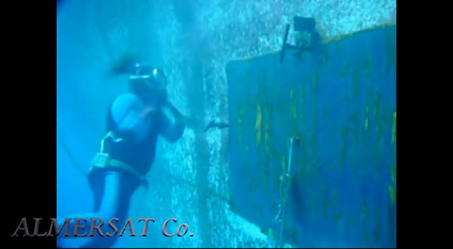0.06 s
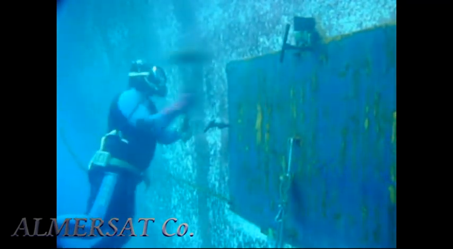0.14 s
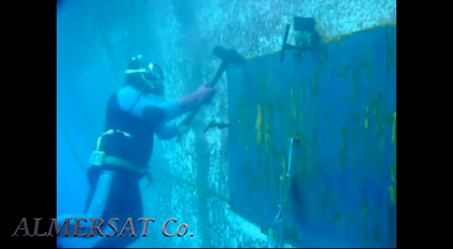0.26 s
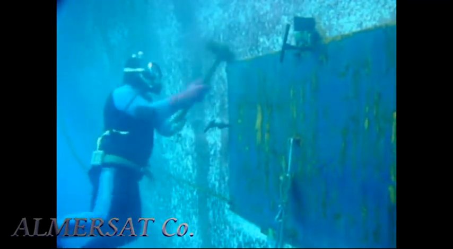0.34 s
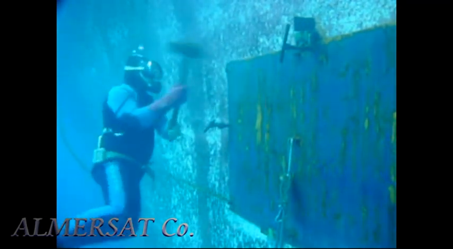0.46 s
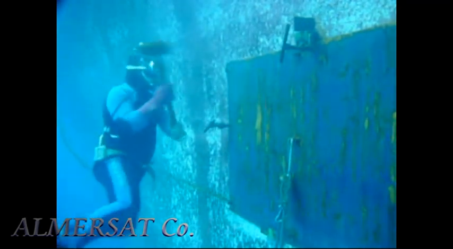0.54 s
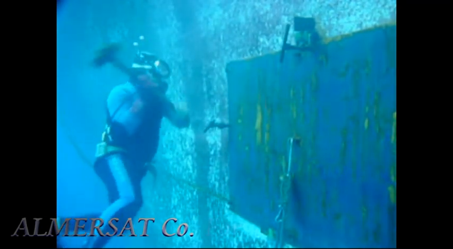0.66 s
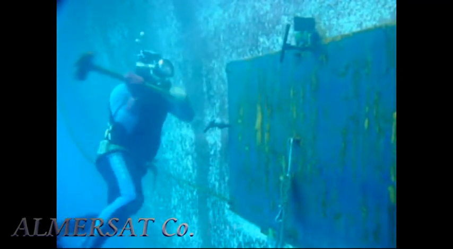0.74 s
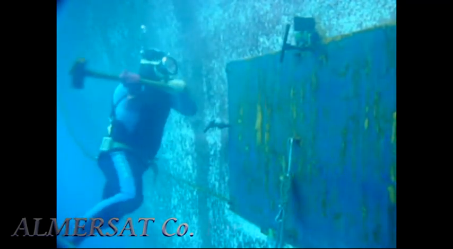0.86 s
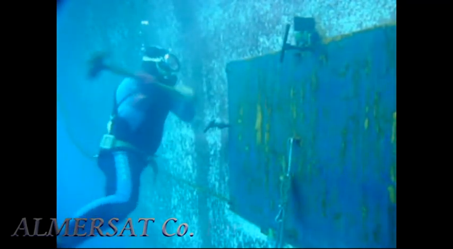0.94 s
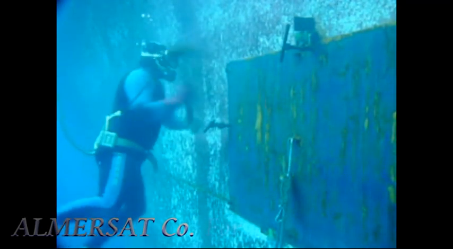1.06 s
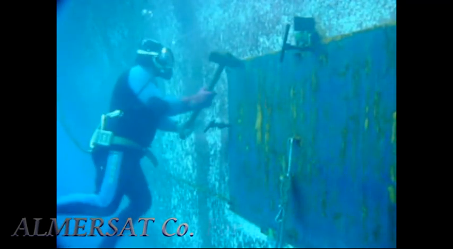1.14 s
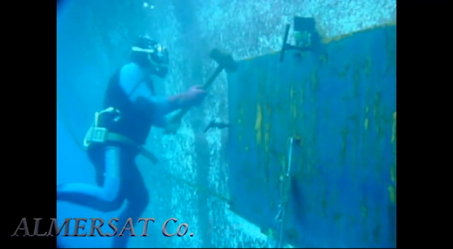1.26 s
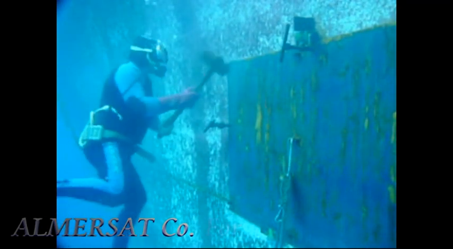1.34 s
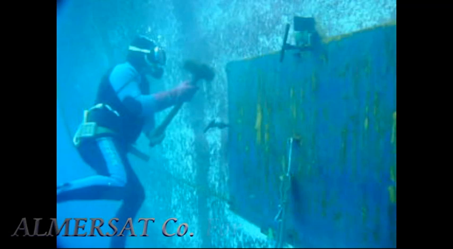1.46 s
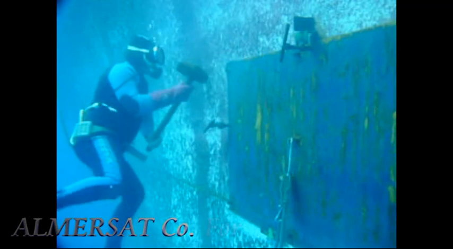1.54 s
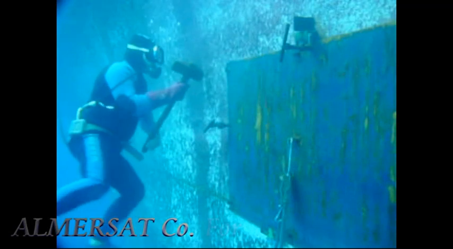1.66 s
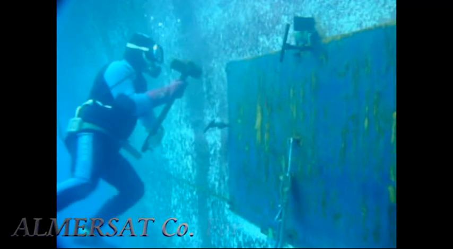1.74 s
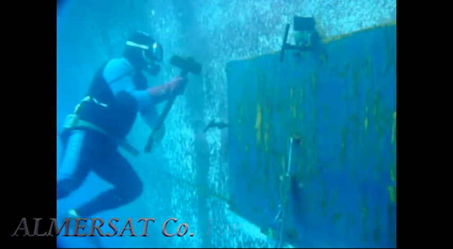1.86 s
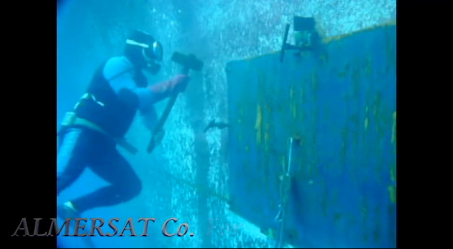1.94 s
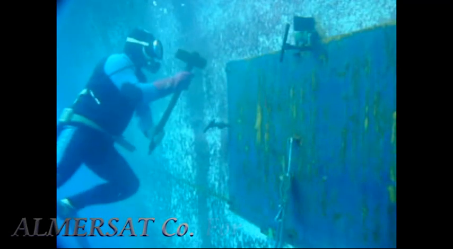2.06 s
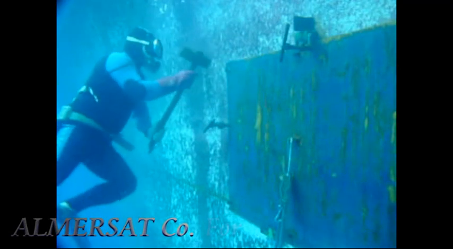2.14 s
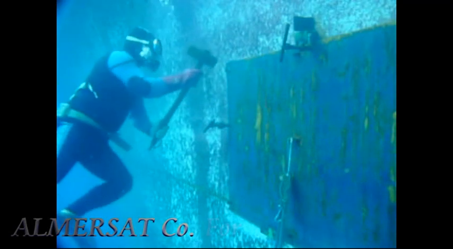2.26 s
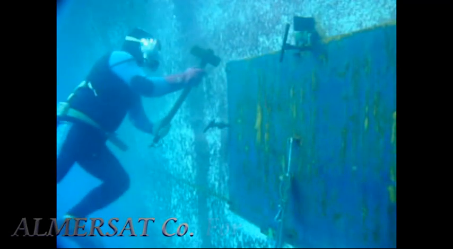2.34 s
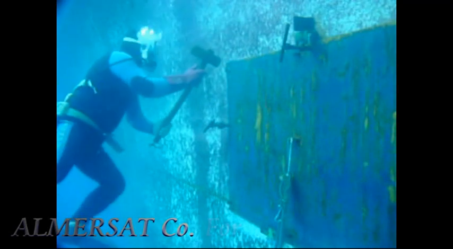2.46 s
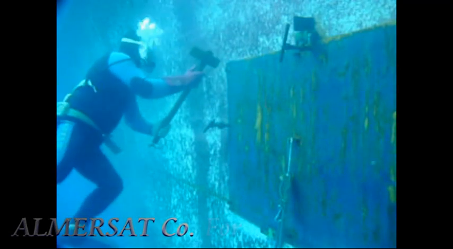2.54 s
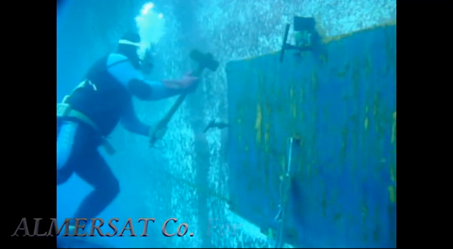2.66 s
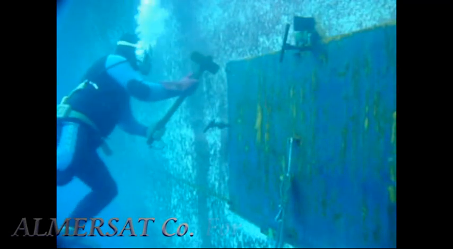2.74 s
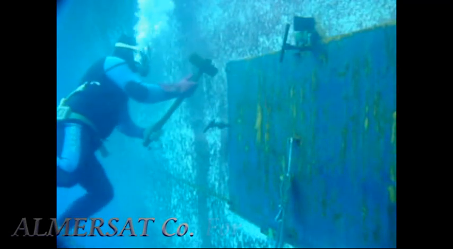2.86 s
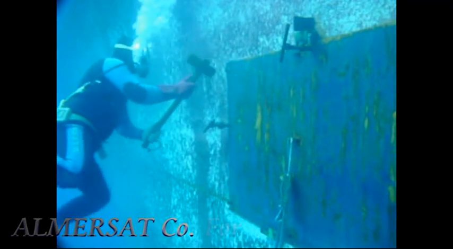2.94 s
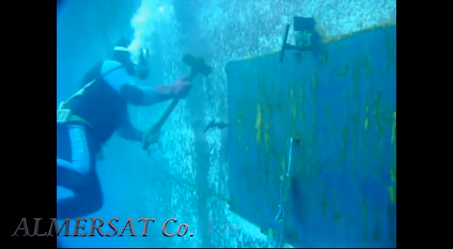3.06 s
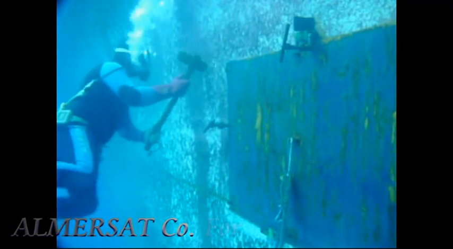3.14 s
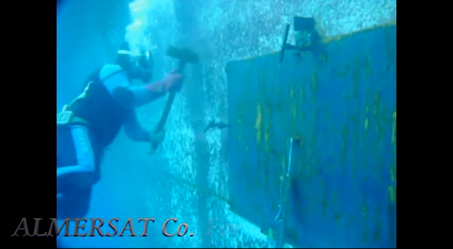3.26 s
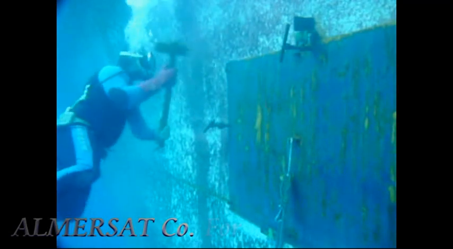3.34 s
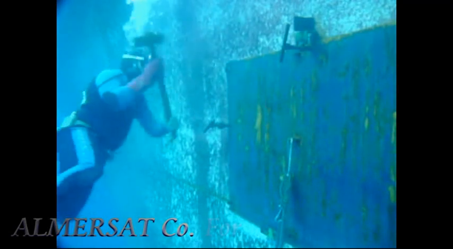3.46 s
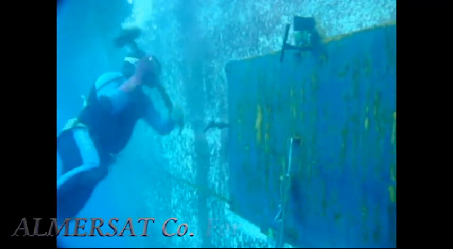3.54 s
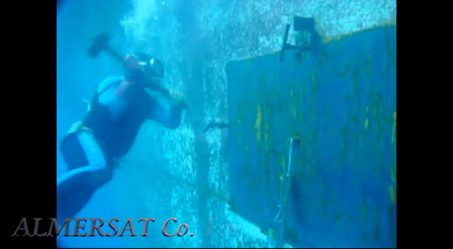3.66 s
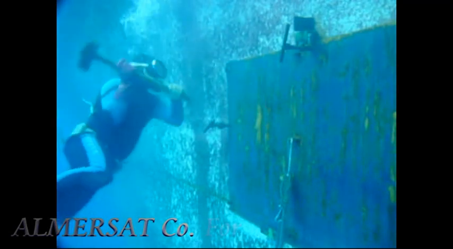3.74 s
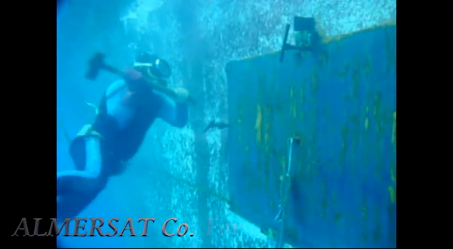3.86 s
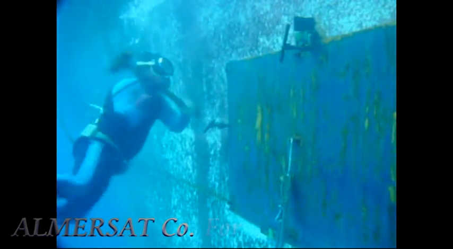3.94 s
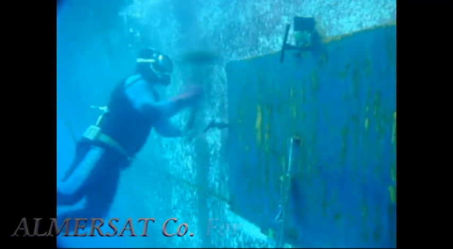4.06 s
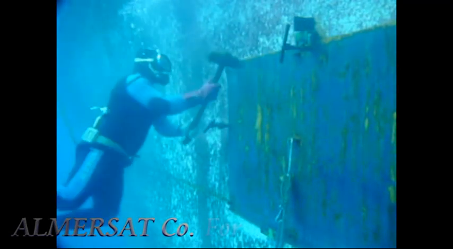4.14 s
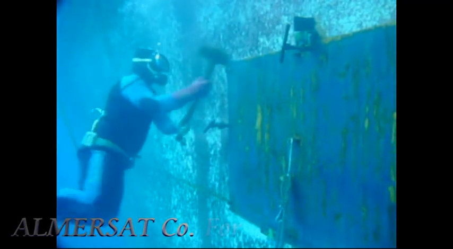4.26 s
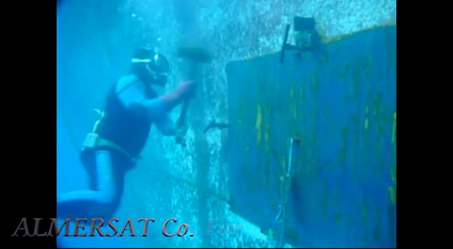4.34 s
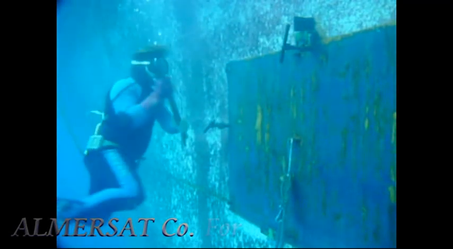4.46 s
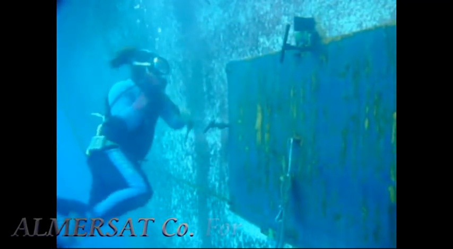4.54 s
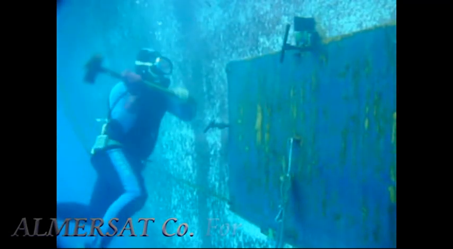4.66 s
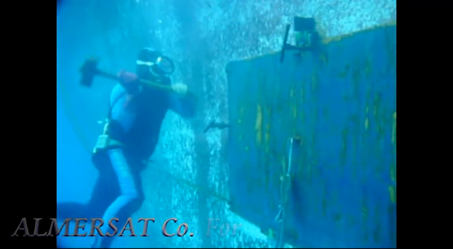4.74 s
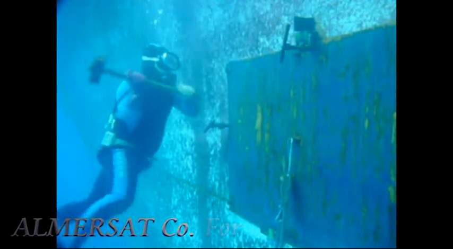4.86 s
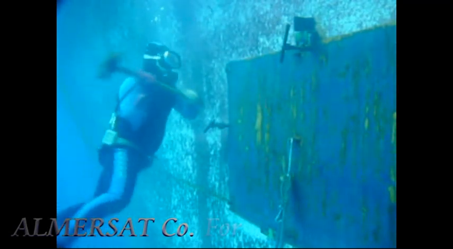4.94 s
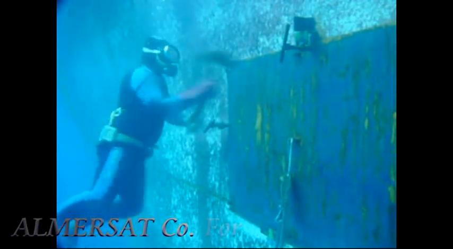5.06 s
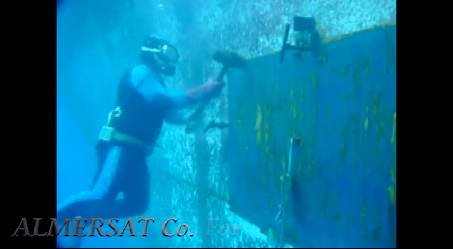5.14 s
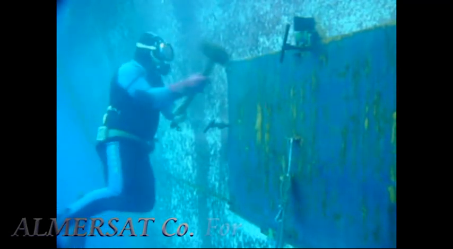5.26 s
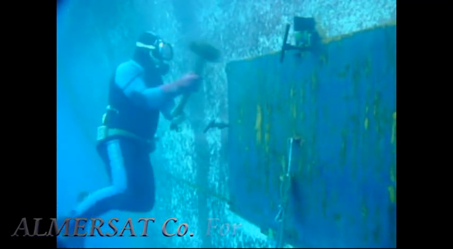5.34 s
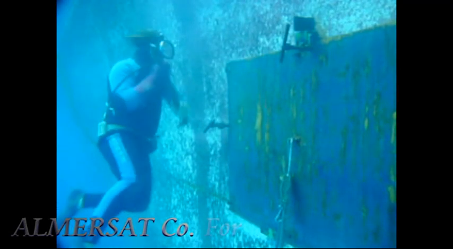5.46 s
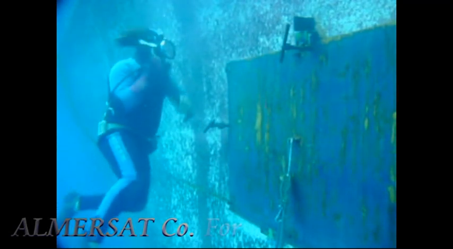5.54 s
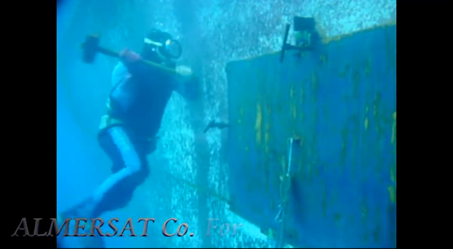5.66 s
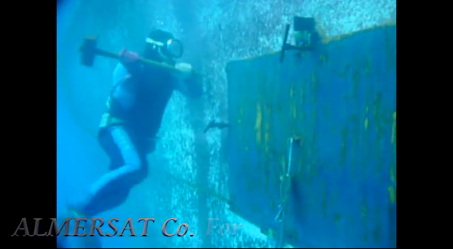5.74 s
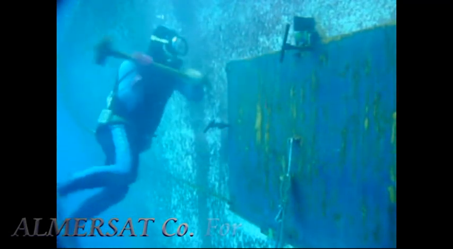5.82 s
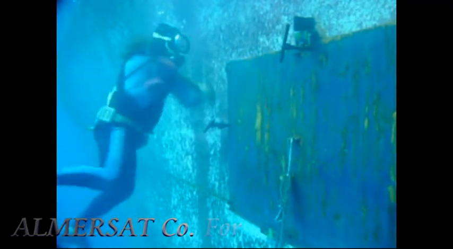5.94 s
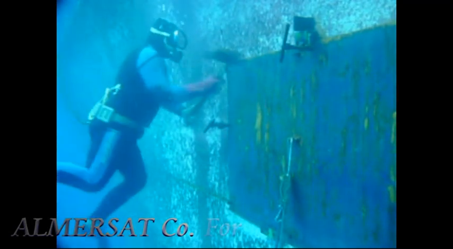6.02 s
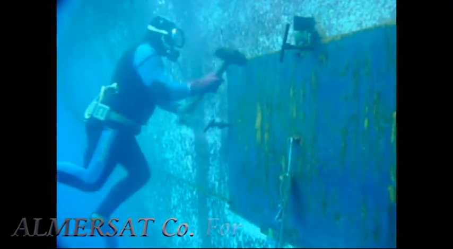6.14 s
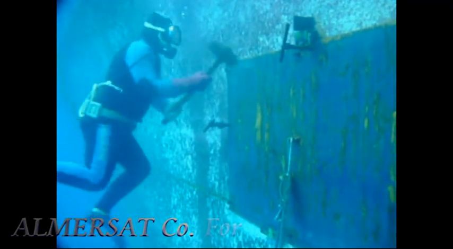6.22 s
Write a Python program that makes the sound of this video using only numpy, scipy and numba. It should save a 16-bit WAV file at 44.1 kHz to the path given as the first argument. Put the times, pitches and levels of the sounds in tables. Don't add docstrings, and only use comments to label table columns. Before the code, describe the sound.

Five heavy, muffled metal hammer blows overload the microphone beneath the water, each followed by a long hollow hull ring and a returning rush.

```python
import sys
import numpy as np
from scipy import signal
from scipy.fft import rfft, irfft, next_fast_len
from scipy.io import wavfile
from scipy.ndimage import uniform_filter1d, map_coordinates
from numba import njit

SR = 44100
rng = np.random.default_rng(int(sys.argv[2]) if len(sys.argv) > 2 else 0)


def magnitude_from_level(level_db):
    exponent = np.asarray(level_db, float) / 20
    return 10 ** exponent


def generate_wav(signal):
    frames = np.transpose(np.atleast_2d(signal))
    scaled = np.clip(frames, -1, 1) * 32767
    pcm = np.round(scaled).astype(np.int16)
    wavfile.write(sys.argv[1], SR, pcm)


N = 277389

# start in seconds, then levels in dB of plate, hull, lower rib and upper rib.
BLOWS = [
    (0.2444, 21.5, 5, -7, 5),
    (1.1724, 21, 5.5, 8, 4.5),
    (4.151, 23.5, 3, 1.5, 11),
    (5.1331, 23, 8, -5.5, 6.5),
    (6.0881, 22.5, 7.5, -5, -12),
]


def unit(x):
    return x / np.sqrt(np.mean(x ** 2) + 1e-20)


def along(points, hz):
    f, v = np.transpose(points)
    return np.interp(np.log(hz + 1), np.log(f + 1), v)


def filtered(x, response):
    m = next_fast_len(N + SR // 2)
    return irfft(rfft(x, m) * response(np.fft.rfftfreq(m, 1 / SR)), m)[..., :N]


def follow(x, span):
    keep = np.exp(-1 / (span * SR))
    return signal.lfilter([1 - keep], [1, -keep], x)


def noise(spectrum, patchy_db):
    hz, t, z = signal.stft(rng.standard_normal((2, N)), SR, nperseg=512)
    field = uniform_filter1d(rng.standard_normal(z.shape[1:]), size=3, axis=0)
    field = uniform_filter1d(field, size=4, axis=1)
    gain = spectrum(hz)[:, None]
    gain = gain / np.sqrt(np.mean(gain ** 2))
    return hz, t, z * magnitude_from_level(patchy_db * unit(field)) * gain


def ports(z, hz):
    # frequency in Hz, level in dB of the differing part under the common one.
    apart = [(700, -75), (950, -101.5), (2000, -36), (4000, -19), (7500, -18)]
    z = z * np.array([np.ones_like(hz), magnitude_from_level(along(apart, hz))])[:, :, None]
    mid, side = signal.istft(z, SR, nperseg=512)[1][:, :N]
    return np.array([mid + side, mid - side])


def struck(spectrum, t60, column, patchy_db, build_s):
    def excited(hz):
        treble_db = 4 * np.log2(hz / 700 + 1)
        return magnitude_from_level(along(spectrum, hz) + treble_db)

    out = np.zeros((2, N))
    for blow in BLOWS:
        hz, t, z = noise(excited, patchy_db)
        decay = magnitude_from_level(blow[column] - 60 * t / along(t60, hz)[:, None])
        build = 1 - np.exp(-(t + 0.0071) / build_s)
        ring = ports(z * decay * build, hz)
        start = round(blow[0] * SR)
        out[:, start:] += ring[:, :N - start]
    return out


def lines(modes, column, unsteady):
    out, t = np.zeros(N), np.arange(N) / SR
    for blow in BLOWS:
        age = np.clip(t - blow[0], 0, None)
        for hz, level, t60 in modes:
            drift = map_coordinates(rng.standard_normal(128), [t * 14], order=1)
            level_db = blow[column] + level + rng.normal(0, 1.67)
            size = magnitude_from_level(level_db - 60 * age / t60) * (age > 0)
            out += size * np.sin(2 * np.pi * hz * age + unsteady * drift)
    return out


def rush():
    # time in seconds, level of the rush in dB.
    flow = [(0, -19.5), (2.3, -11), (3.2, -16.5), (4.5, -17), (6.3, -8.5)]
    # frequency in Hz, width in Hz, level in dB.
    housing = [(510, 4.3, -8), (682, 25, -3), (1344, 290, -9), (2007, 43, -9.5), (2424, 29, -12.5),
               (3430, 27, -16), (3637, 39, -16.5), (4234, 16, -21), (4494, 48, -18.5), (5620, 28, -20.5),
               (6040, 66, -24.5), (6620, 190, -25.5), (7320, 81, -24.5)]
    # frequency in Hz, density in dB per Hz.
    water = [(18, -81), (30, -51), (347, 0), (390, 19), (469, -17), (526, 12.5), (648, -4), (744, 11.5),
             (1030, -9.5), (7500, -102), (9750, -67), (16500, -120)]

    def transmitted(f):
        peaks = sum(magnitude_from_level(db) ** 2 / (1 + (2 * (f - c) / w) ** 2) for c, w, db in housing)
        stiff = magnitude_from_level(-46) + 1 / (1 + (300 / (f + 1)) ** 4)
        return stiff * np.sqrt(peaks + magnitude_from_level(along(water, f) - 3.0) ** 2)

    hz, t, z = noise(transmitted, patchy_db=1.5)
    steady = magnitude_from_level(np.interp(t, *np.transpose(flow)))
    shake_db, shake_t60 = -20.5, 0.75
    shake = 0
    for s, db, *_ in BLOWS:
        shake = shake + magnitude_from_level(db + shake_db - 60 * np.clip(t - s, 0, 9) / shake_t60) * (t > s)
    upper = 1 + (1700 / (hz[:, None] + 1)) ** 6
    return ports(z * (steady + shake / upper), hz)


def ticks():
    # start in seconds, peak level in dB.
    knocks = [(0.386, -17), (.65, -11), (.8, -12), (2.0374, -8), (3.252, -22.5), (5.72, -9)]
    out, t = np.zeros(N), np.arange(SR // 10) / SR
    for s, db in knocks:
        burst = magnitude_from_level(db + 10.0 - 60 * t / 0.07) * (1 - np.exp(-t / 0.012))
        out[round(s * SR):][:len(t)] += burst * rng.standard_normal(len(t))
    return filtered(out, lambda hz: (hz > 1500) / (1 + (hz / 4000) ** 2))


def ribs():
    # frequency in Hz, level in dB, t60 in seconds.
    lower_rib = [(637, -6, 3.5)]
    upper_rib = [(904.4, -7, 1.1)]
    return lines(lower_rib, column=3, unsteady=1.0) + lines(upper_rib, column=4, unsteady=0.9)


def hull():
    # frequency in Hz, density in dB per Hz.
    boom = [(22, -56.5), (45, -25), (70, -14), (140, -18), (260, -1), (400, -4.5), (540, -3), (700, -3.5),
            (850, -13.5), (1000, -28), (1300, -12.5), (1520, -13), (1650, -25), (7500, -46)]
    # frequency in Hz, t60 in seconds.
    boom_t60 = [(60, 2.54), (150, 2.28), (300, 2.67), (600, 2.39), (1000, 1.39), (3000, 1.004)]
    # frequency in Hz, level in dB, t60 in seconds.
    long_modes = [(142.3, -21, 3.32), (257.5, -3.5, 1.54), (328.4, -17, 4.8), (431.3, -12, 3.08),
                  (543, -8.5, 3), (715.5, -5, 2.56), (756.7, -7, 2.08)]
    dense = struck(boom, boom_t60, column=2, patchy_db=3.0, build_s=0.11)
    return dense + lines(long_modes, column=2, unsteady=1.34)


def chatter():
    # frequency in Hz, density in dB per Hz.
    rattle = [(700, -18.5), (1300, 4), (2100, -6), (3500, -11), (5500, -13), (7500, -23)]
    swell, push = np.zeros(N), np.zeros(N)
    for s, db, *_ in BLOWS:
        age = np.arange(N) / SR - s
        swell += magnitude_from_level(db - 18.5) * np.exp(-np.abs((age - .05) / 0.044) ** 3) * (age > 0)
        fading = np.clip(age, 0, 1)
        sharp = magnitude_from_level(db + 1.5 - 60 * fading / 0.014)
        lasting = magnitude_from_level(db - 10 - 60 * fading / 0.22)
        push -= (sharp + lasting) * (age > 0)
    heave = unit(filtered(rng.standard_normal(N), lambda hz: hz / (1 + (hz / 70) ** 3)))
    contact = unit(filtered(rng.standard_normal(N), lambda hz: magnitude_from_level(along(rattle, hz))))
    return push + swell * (magnitude_from_level(-3.5) * heave + contact)


def plate():
    # frequency in Hz, density in dB per Hz.
    clang = [(30, -47), (120, 3), (350, -1.5), (700, -1), (900, -10), (1300, -19), (2200, -17),
             (4000, -28.5), (7500, -66)]
    # frequency in Hz, t60 in seconds.
    clang_t60 = [(100, .2), (400, .3), (700, .5), (1100, .22), (5000, .13)]
    # frequency in Hz, level in dB, t60 in seconds.
    bending = [(659.4, -17, 1), (694, -13.5, 1), (746.7, -10.5, 0.78)]
    dense = struck(clang, clang_t60, column=1, patchy_db=2, build_s=.001)
    return dense + lines(bending, column=1, unsteady=0.51)


def scene():
    # frequency in Hz, left minus right in dB.
    lean = [(800, 0), (1100, -0.6), (2500, -1.8), (5000, -0.5), (7500, -4)]
    wet = rush() + ticks() + ribs() + hull() + chatter() + plate()
    return filtered(wet, lambda hz: magnitude_from_level(np.array([[.5], [-.5]]) * along(lean, hz)))


@njit
def slewed(want_db, fall, ease, rise):
    out = np.zeros(len(want_db))
    for i in range(1, len(out)):
        gap = want_db[i] - out[i - 1]
        out[i] = out[i - 1] + (max(gap * ease, -fall) if gap < 0 else min(gap, rise))
    return out


def gain_control(x, aim_db, fall_db, ease, rise_db, span, lag):
    level = follow(np.mean(x, axis=0) ** 2, span)
    want = np.minimum(aim_db - 10 * np.log10(level + 1e-9), 0)
    late = np.maximum(want, np.pad(want, (round(lag * SR), 0))[:N])
    return x * magnitude_from_level(slewed(late, fall_db / SR, 1 / (ease * SR), rise_db / SR))


def overload(x, sag, spread, settle, leak, span):
    low, high, held = .9, .6, .4
    excess = follow(np.clip(np.abs(x) - low, 0, None), span=.005)
    stages = [np.clip(x - (sag + k * spread) * excess, -low, high) for k in (-1, 1)]
    edges = x - follow(x, span=0.000067)
    y = sum(stages) / 2 + leak * edges
    return y + settle * follow(np.clip(-follow(y, span) - held, 0, None), span)


def converter(x):
    # frequency in Hz, density in dB per Hz.
    hiss = [(3000, -17), (6500, -10), (7000, -8), (7300, 6.5), (7500, -5)]
    rate, edge_hz, top_hz = 16000, 7560, 15420
    x = x + magnitude_from_level(-39) * unit(filtered(rng.standard_normal(N), lambda hz: magnitude_from_level(along(hiss, hz))))
    x = filtered(x, lambda hz: (hz < edge_hz) / np.sqrt(1 + (hz / 6000) ** 6))
    count = round(N * rate / SR)
    slow = signal.resample(x, count, axis=1)
    x = np.array([np.interp(np.arange(N) * count / N, np.arange(count), c) for c in slow])
    return filtered(x, lambda hz: (hz < top_hz) * np.where(hz > rate / 2, magnitude_from_level(2.0), 1))


def thinned(x, floor_db, side_db, range_db, mood_db, rich, size):
    hz, t, z = signal.stft(np.array([x[0] + x[1], x[0] - x[1]]) / 2, SR, nperseg=2048)
    band = np.sqrt(np.abs(uniform_filter1d(np.abs(z) ** 2, size=size, axis=1)))
    mid, side = np.repeat(band[:, ::size], size, axis=1)[:, :len(hz)]
    chance = uniform_filter1d(rng.standard_normal(band[0, ::size].shape), size=3, axis=1)
    chance = np.repeat(unit(chance), size, axis=0)[:len(hz)]
    threshold = np.maximum(magnitude_from_level(floor_db), magnitude_from_level(-range_db) * mid[:24 * size].mean(axis=0))
    keep = (mid > threshold * magnitude_from_level(mood_db * chance)) | (hz[:, None] < 3800)
    spare = rng.random(len(t)) < rich
    keep_side = keep & ((side > magnitude_from_level(side_db)) & (hz[:, None] > 900) | spare)
    mid, side = signal.istft(z * np.array([keep, keep_side]), SR, nperseg=2048)[1][:, :N]
    return np.array([mid + side, mid - side])


def band_limit(x):
    return signal.sosfilt(signal.butter(12, 15420, fs=SR, output="sos"), x)


def record(dry):
    x = gain_control(dry, aim_db=-17.5, fall_db=601, ease=0.057, rise_db=44.5, span=0.01, lag=0.056)
    x = overload(x, sag=.55, spread=0.5, settle=2.4, leak=.015, span=.005)
    x = converter(x)
    x = thinned(x, floor_db=-86.5, side_db=-88.5, range_db=37.5, mood_db=3.0, rich=0.13, size=12)
    return band_limit(np.clip(x, -1, 1))


dry = scene()
out = record(dry)
generate_wav(out)
```